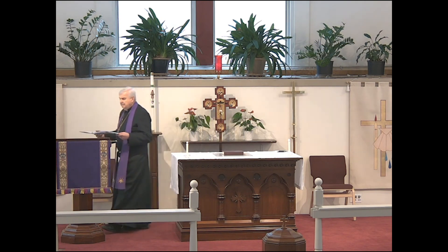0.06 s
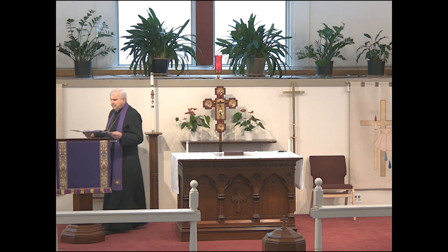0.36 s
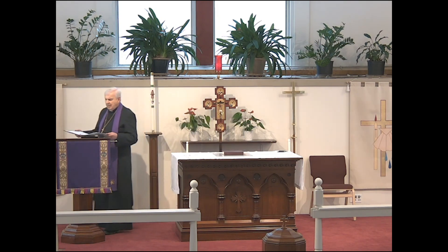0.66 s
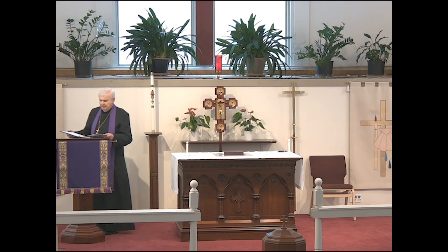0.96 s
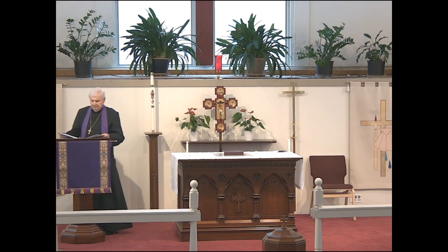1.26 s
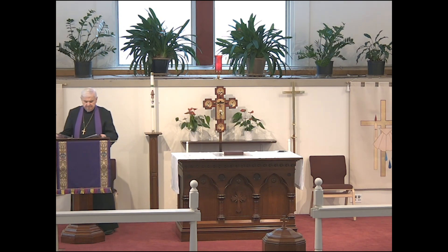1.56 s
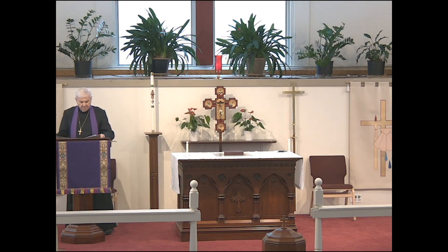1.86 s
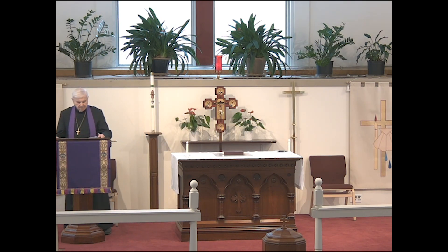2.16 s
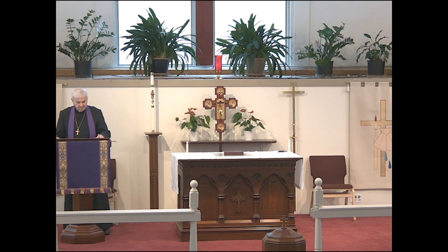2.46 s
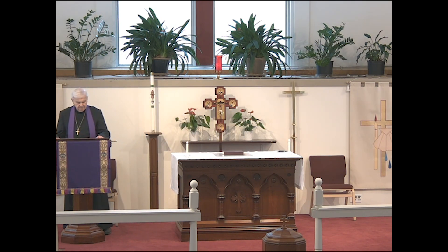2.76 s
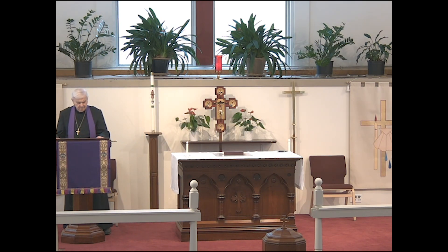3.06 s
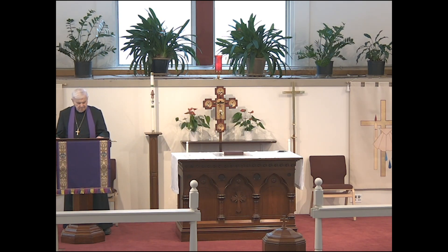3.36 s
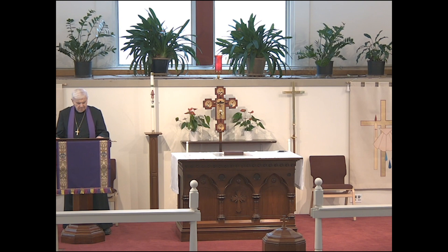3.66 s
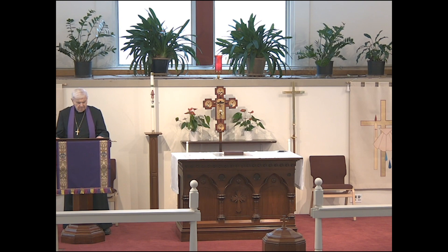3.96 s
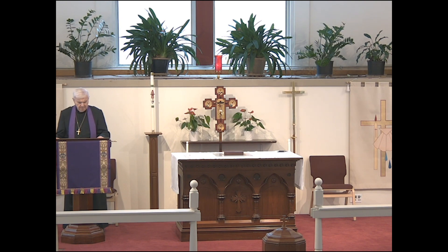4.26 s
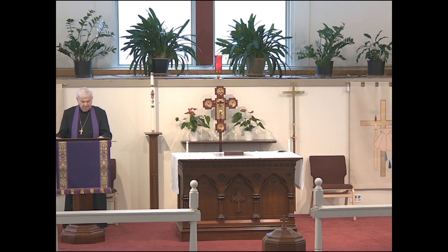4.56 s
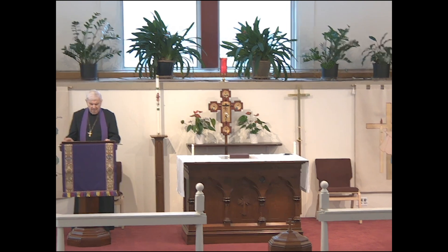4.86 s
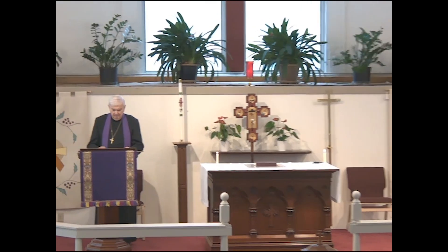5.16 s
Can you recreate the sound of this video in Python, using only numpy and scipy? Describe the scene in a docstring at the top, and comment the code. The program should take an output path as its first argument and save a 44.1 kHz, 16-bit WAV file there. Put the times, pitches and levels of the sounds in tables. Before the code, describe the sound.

Faint ventilation rumble and hiss fill a quiet hall throughout. At the start a floorboard gives softly and a robe barely swishes. At about 1.2 seconds a book touches a wooden lectern, landing with a firmer hollow thump and papery crack at 1.5. From 1.8 to 2.3 seconds it slides into place with light ticks and a hiss of pages. Between 2.4 and 3.3 seconds the cover scrapes and gives tiny squeaks, the desk top shudders low under leaning hands, and a few more taps follow. At 3.7 seconds a hand bumps the microphone and drags along its neck with a low rub. At about 4.15 seconds the holder snaps round with a quick cluster of clacks and thumps, the loudest moment, briefly distorting. Then only ventilation remains. All the handling sounds are very close, carried through the wood, with little hall echo.

```python
"""A quiet hall, at a wooden lectern: a book is set down and slid into place, the microphone is handled. Over
ventilation noise a robe swishes and a floorboard gives. Thumps reach the microphone through the wood; paper
ticks and hisses; a hand scrapes and squeaks on the desk; the desk top shudders under leaning hands. Last, a
hand drags on the microphone neck and the holder snaps round with a clack that clips the input."""
import sys
import numpy as np
from scipy import signal
from scipy.fft import rfft, irfft
from scipy.io import wavfile
from scipy.ndimage import uniform_filter1d

SR = 44100
rng = np.random.default_rng(int(sys.argv[2]) if len(sys.argv) > 2 else 0)


def unload_audio(sound):
    """Save the sound as a 16-bit wav file, at the path given as the first command line argument."""
    columns = np.transpose(np.atleast_2d(sound))
    # keep every value between -1 and 1, then stretch to whole-number steps
    steps = np.round(np.clip(columns, -1, 1) * 32767)
    wavfile.write(sys.argv[1], SR, steps.astype(np.int16))


N = 230095
T = np.arange(N) / SR
EVENT_T = T[:SR // 2]

# Strokes: t = end of swell; swell and fade = time per 20 dB. Spectra and resonances: relative gains.
# ventilation spectrum: f/Hz, gain/dB
VENT_SPECTRUM = [(26, -45), (45, -9), (70, 0.5), (91, -11), (189, -7), (208, -13), (355, -14.5), (391, -20),
                 (421, -16.5), (652, -19.5), (773, -20.5), (873, -20.5), (9920, -40), (13600, -45.5),
                 (15000, -58)]
# hall resonances: f/Hz, width/Hz, gain/dB
HALL_MODES = [(680, 36, 15), (1230, 50, 15)]
# robe strokes: t/s, level/dB, swell/s, fade/s
ROBE_SWISHES = [(.08, -70, 0.4, 0.12), (.21, -90, 0.064, 0.053), (.89, -68, 0.084, 0.088)]
# cloth rustle bands: f/Hz, width/Hz, gain/dB
ROBE_BANDS = [(1170, 230, 1.5), (2200, 660, -4.5)]
# page strokes: t/s, hold/s, level/dB, swell/s, fade/s, edge trim/dB
PAGE_GLIDES = [(1.225, 0, -58.5, 0.0039, 0.079, -11), (1.446, 0.0042, -69, 0.081, 0.13, 0.5),
               (1.614, 0.17, -63.5, 0.21, 0.21, -26.5), (1.94, 0.098, -68, 0.15, 0.22, 4.5),
               (2.964, 0.081, -68, 0.21, 0.075, -12), (4.133, 0.03, -59.5, 0.22, 0.025, -5.5)]
# sheet on sheet: f/Hz, gain/dB
PAGE_SPECTRUM = [(800, -1), (2000, -3), (3300, -2), (4800, -1), (6200, -4), (8000, -10.5), (14000, -17)]
# dragging page edge: f/Hz, width/Hz, gain/dB
EDGE_BAND = [(9600, 8600, 0)]
# hands leaning on the desk: t/s, level/dB, fade/s
HAND_LEANS = [(2.546, -39.5, 0.15), (2.77, -47.5, 0.33), (3.32, -58.5, 0.94), (4.33, -51.5, 0.13)]
# hand squeaking on the desk: t/s, peak/dB, f/Hz, t60/s
HAND_SQUEAKS = [(2.368, -39, 1266, 0.037), (2.385, -51.5, 1248, 0.069), (2.474, -53.5, 1208, 0.27),
                (2.524, -53, 1165, 0.11), (2.756, -40, 1156, 0.039), (2.767, -45.5, 1166, 0.049)]
# pushes of the book: t/s, hold/s, relative level/dB
BOOK_PUSHES = [(1.233, 0.11, -63.5), (1.433, 0.015, -63), (1.62, 0.2, -65.5), (1.88, 0.019, -62),
               (1.928, 0.083, -49.5), (2.041, 0.025, -48), (2.139, 0.059, -53.5), (2.231, 0.022, -55.5)]
# book on desk: f/Hz, gain/dB
SLIDE_SPECTRUM = [(35, -44), (60, -3), (127, 2.5), (231, -12.5), (325, -9.5), (468, -13), (530, -5.5),
                  (660, -7), (810, -12.5), (1000, -18.5), (1220, -17), (1400, -22), (2470, -25.5),
                  (3480, -36), (3990, -25), (14000, -59)]
# stiff cover: f/Hz, width/Hz, gain/dB
COVER_MODES = [(647, 37, -3), (792, 52, 0)]
# hand strokes on the desk: t/s, relative level/dB, swell/s, fade/s
HAND_SCRAPES = [(2.373, -45, 0.0057, 0.027), (2.519, -52, 0.072, 0.14), (2.705, -54, 0.04, 0.13),
                (2.758, -40, 0.021, 0.022), (2.84, -58.5, 0.015, 0.16), (2.998, -50, 0.024, 0.027),
                (3.206, -47.5, 0.039, 0.063), (3.229, -44.5, 0.01, 0.03), (3.255, -52.5, 0.012, 0.073)]
# scraped desk top: f/Hz, width/Hz, gain/dB
DESK_MODES = [(305, 53, 11.5), (505.2, 15.6, 9.5), (587, 18, 4.5), (806, 35, -4), (1143, 5.2, 9),
              (2030, 88, -11.5), (3820, 44, -7.5)]
# hand on the neck, easing or tightening: t/s, hold/s, relative level/dB, sag/(dB/s)
NECK_GRIPS = [(3.66, 0.17, -37.5, 28), (3.911, 0.316, -45.5, -18.5)]
# skin on the neck: f/Hz, gain/dB
GRIP_SPECTRUM = [(24, -27.5), (40, -21), (100, 2), (158, -4.5), (207, -9.5), (401, -21.5), (512, -20.5),
                 (700, -33.5), (815, -40.5), (1150, -37), (2710, -43.5), (14000, -58)]
# paper and cover tapping the desk: t/s, peak/dB, t60/s, struck spot f/Hz
BOOK_TAPS = [(1.223, -37, 0.02, 5370), (1.456, -49, .012, 2080), (1.5002, -28, 0.015, 3360),
             (1.5046, -24.5, 0.0038, 4350), (1.6096, -39, 0.0051, 3820), (1.625, -43.5, 0.017, 1030),
             (1.8518, -47, .012, 2010), (1.89, -43, 0.017, 1530), (1.9291, -42.5, 0.022, 804),
             (1.9596, -37, 0.022, 4850), (1.986, -47, 0.01, 4000), (2.017, -41, .025, 780),
             (2.0293, -30.5, 0.0051, 4300), (2.049, -39.5, 0.042, 1620), (2.085, -50, 0.023, 720),
             (2.1202, -34, 0.016, 850), (2.2329, -33, 0.011, 2070), (2.248, -34.5, 0.019, 2170),
             (2.255, -42, 0.045, 1500), (2.271, -43.5, 0.031, 2590), (2.4048, -30.5, 0.0068, 1900),
             (3.04, -47.5, 0.032, 1180), (3.13, -39, 0.018, 3800), (3.199, -29.5, 0.012, 2310),
             (3.208, -32.5, 0.036, 2700), (3.2149, -33, 0.014, 3650), (3.225, -27.5, 0.021, 3940),
             (3.697, -41, .007, 2500), (3.724, -40.5, 0.0068, 2970), (3.992, -42.5, 0.011, 2750),
             (4.062, -44, 0.0091, 6000), (4.1349, -22.5, 0.011, 4340), (4.2278, -41, 0.007, 2020),
             (4.295, -45, 0.018, 2960)]
# taps and crackles: f/Hz, gain/dB
PAPER_SPECTRUM = [(120, 10.5), (400, 7), (1000, -1.5), (2200, -4.5), (3200, -5), (4400, -3.5), (7000, -8.5),
                  (14000, -9)]
# blows on the lectern; a resting hand shortens the ring and stiffens the stand:
# t/s, peak/dB, contact/ms, t60 factor, relative sway/dB, sway f/Hz
LECTERN_BLOWS = [(1.222, -31, 1.44, 1.45, -23, 60), (1.236, -26.5, 3.2, 0.61, 12, 100),
                 (1.454, -42.5, 2.1, 1.3, -17, 70), (1.5, -13, 10.3, 0.88, 6.5, 95),
                 (1.5083, -21.5, 1.94, 0.79, 11, 92), (1.625, -45, 1.5, 1.6, -14, 70),
                 (1.792, -40, 4.6, 0.83, -16, 70), (2.018, -34, 7.2, 1.8, 12, 70),
                 (2.05, -42, 3.3, 0.56, 1, 65), (2.062, -33, 2.5, .7, 1, 90),
                 (2.12, -37.5, 0.74, 0.52, 1, 70), (2.282, -38.5, 5.2, 1.4, -15, 69.6),
                 (2.379, -40.5, 6.2, 1.6, -29, 70), (2.769, -34, 1.9, 1.33, -2, 65),
                 (3.003, -34, 4.2, 0.74, -6, 79), (3.229, -25.5, 0.78, 0.83, 10, 75),
                 (3.666, -17, 4.1, 0.38, 7, 110), (3.76, -33.5, 3, 1.2, -2, 110),
                 (3.827, -32.5, 5.2, 2.2, 3, 89), (4.067, -26.5, 3.5, 0.32, 6, 126),
                 (4.111, -39, 3.2, 0.55, 0.5, 140), (4.1363, -14.5, 4.3, 0.21, -15, 92),
                 (4.147, -8.5, 1.2, 0.55, 8.5, 62), (4.17, -16.5, 2.2, 0.23, 14, 180),
                 (4.184, -28.5, 7, 0.24, 23, 69.2), (4.1953, -12.5, 2.45, 0.28, 1, 115),
                 (4.3, -45.5, 2.14, 1.5, -21, 70)]
# lectern wood: f/Hz, gain/dB, t60/s
WOOD_MODES = [(85, -3, 0.29), (106.3, 5, 0.17), (129.2, -3.5, 0.13), (169.2, -2, 0.12), (197.3, 0, 0.25),
              (307, -17.5, 0.048), (324.3, -5, 0.11), (434, -10, 0.2), (520, -2.5, 0.14), (547, -9, 0.096),
              (617.5, -6, 0.2), (650, -19, 0.095), (854, -4, 0.06), (987, -10.5, 0.186), (1200, -12, 0.1)]
# metal neck snapping as it bends: t/s, peak/dB
NECK_SNAPS = [(3.6796, -45), (3.697, -55), (3.7035, -50), (3.7239, -32.5), (4.1349, -20), (4.1493, -22)]
# metal neck: f/Hz, width/Hz, gain/dB
NECK_MODES = [(9870, 360, 2), (11400, 870, -11)]
# holder knocking in its socket: t/s, peak/dB, cutoff/Hz
HOLDER_KNOCKS = [(4.1355, -30, 4500), (4.146, -7, 6000), (4.148, -11, 3400), (4.15, -13, 3960),
                 (4.1705, -19, 2900), (4.1787, -21, 2200)]
# damped holder body: f/Hz, width/Hz, gain/dB
HOLDER_MODES = [(280, 19, 17), (349, 42, 17.5), (410, 40, 15.5), (491, 34.6, 18.5), (685, 30, 13.5),
                (924, 29, 10), (1049, 23, 2), (1387, 71, 5.5), (1580, 40, 4), (1747, 67, 5),
                (1962, 108, 15), (2350, 55, 4.5), (2656, 130, 1), (3470, 71, -2.5), (4360, 70, -11.5),
                (5100, 330, -12.5)]


def undb(db):
    """Decibels to gain."""
    return 10 ** (np.asarray(db) / 20)


def unit(x):
    """Scale to rms 1."""
    return x / np.sqrt(np.mean(x ** 2))


def peak(x, db):
    """Scale to a peak level."""
    return x * undb(db) / np.abs(x).max()


def decay(t60_s, t=EVENT_T):
    """Exponential decay."""
    return np.exp(-np.log(1000) * t / max(t60_s, 1e-4))


def add(out, t_s, x):
    """Mix x in at t_s."""
    i = int(t_s * SR)
    out[i:i + len(x)] += x[:N - i]


def lowpass(x, hz):
    """Second-order roll-off."""
    return signal.sosfilt(signal.butter(2, min(hz, .45 * SR), fs=SR, output="sos"), x)


def colour(x, spectrum):
    """Causal filter with the given spectrum, via its cepstrum."""
    hz, db = np.transpose(spectrum)
    size = 2 ** 13
    log_hz = np.log(np.fft.rfftfreq(size, 1 / SR) + 1)
    log_gain = np.log(undb(np.interp(log_hz, np.log(hz), db)))
    cepstrum = irfft(log_gain)[:size // 2]
    cepstrum[1:] *= 2
    return signal.fftconvolve(x, irfft(np.exp(rfft(cepstrum, size))))[:len(x)]


def resonate(x, modes):
    """Parallel resonators."""
    return sum(undb(db) * signal.lfilter(*signal.iirpeak(hz, hz / width_hz, SR), x)
               for hz, width_hz, db in modes)


def wander(rate_hz):
    """Smooth random drift, rms 1."""
    span = int(SR / rate_hz)
    steps = np.repeat(rng.standard_normal(N // span + 1), span)
    return unit(uniform_filter1d(steps, span)[:N])


def friction(slips_per_s, patchy_db):
    """Dense tiny slips, uneven in size, in patches."""
    slips = (rng.random(N) < slips_per_s / SR) * rng.standard_normal(N)
    size_db = 2.5 * np.minimum(rng.exponential(size=N), 4)
    return slips * undb(size_db + patchy_db * wander(70))


def stroke(t_s, db, swell_s, fade_s, hold_s=0, sag_db_per_s=0):
    """Gain of one rub: swell, sloping hold, fade."""
    before_s, after_s = np.maximum(t_s - T, 0), np.maximum(T - t_s - hold_s, 0)
    sag_db = sag_db_per_s * np.clip(T - t_s, 0, hold_s)
    return undb(db - sag_db - 20 * (before_s / swell_s + after_s / fade_s))


def ventilation(level_db=-63.5):
    """Steady rumble and hiss."""
    return undb(level_db) * unit(colour(rng.standard_normal(N), VENT_SPECTRUM))


def reverb(x, tail_db=-40, tail_t60_s=0.93, early_db=-38, early_t60_s=0.21, delay_s=.02):
    """Short dull wash off nearby panels, dark hall tail; faint, as the sources are close."""
    tail, early = rng.standard_normal((2, N)) * (T > delay_s)
    tail = lowpass(lowpass(tail, 900) + resonate(tail, HALL_MODES), 1500) * decay(tail_t60_s, T)
    early = lowpass(lowpass(early, 1500), 1500) * decay(early_t60_s, T)
    response = undb(tail_db) * tail / np.linalg.norm(tail) + undb(early_db) * early / np.linalg.norm(early)
    return signal.fftconvolve(x, response)[:N]


def robe():
    """Swinging cloth: soft rushes of tiny slips."""
    cloth = unit(resonate(friction(3500, patchy_db=5), ROBE_BANDS))
    return cloth * sum(stroke(*swish) for swish in ROBE_SWISHES)


def footfall(t_s=.192, peak_db=-43.5, hz=116, t60_s=.19, settle_t60_s=0.031):
    """A floorboard's note sinks as weight settles; the sole scuffs."""
    settling = decay(settle_t60_s)
    phase = 2 * np.pi * np.cumsum(hz * (1 + 1.4 * settling)) / SR
    scuff = 0.088 * unit(resonate(rng.standard_normal(len(EVENT_T)), [(260, 100, 0)]))
    out = np.zeros(N)
    add(out, t_s, peak((np.sin(phase) + scuff) * decay(t60_s) * (1 - settling), peak_db))
    return out


def pages(edge_db=-3):
    """Sheets hiss face to face, brighter where an edge drags."""
    slips = friction(8000, patchy_db=0.5)
    face = unit(colour(slips, PAGE_SPECTRUM))
    edge = unit(resonate(resonate(slips, EDGE_BAND), EDGE_BAND))
    return sum((face + undb(edge_db + trim_db) * edge) * stroke(t_s, db, swell_s, fade_s, hold_s)
               for t_s, hold_s, db, swell_s, fade_s, trim_db in PAGE_GLIDES)


def desk_shudder(hz=73.5, wobble=0.0642, swell_s=0.064):
    """Slow stick-slip swings the desk top unevenly near its lowest mode."""
    phase = 2 * np.pi * np.cumsum(hz * (1 + wobble * wander(10))) / SR
    swing = unit(np.sin(phase) * undb(2.5 * wander(30)))
    return swing * sum(stroke(t_s, db, swell_s, fade_s) for t_s, db, fade_s in HAND_LEANS)


def hand_squeaks(sharp=0.033, settle_t60_s=.04, jitter=.04, rise_share=0.35):
    """Stick-slip: starts sharp, settles on an unsteady pitch; long squeaks start softly."""
    out = np.zeros(N)
    for t_s, db, hz, t60_s in HAND_SQUEAKS:
        bend = 1 + sharp * decay(settle_t60_s) + jitter * wander(590)[:len(EVENT_T)]
        phase = 2 * np.pi * np.cumsum(hz * bend) / SR
        tone = np.sin(phase) + undb(-18) * np.sin(1.8 * phase)
        add(out, t_s, peak(tone * decay(t60_s) * (1 - decay(rise_share * t60_s)), db))
    return out


def book_slide(glide_db=4.5, crackle_db=-13, crackles_per_s=90):
    """Slips ring the cover, paper catches and crackles; each push slows as it goes."""
    slips = friction(3000, patchy_db=1.8)
    glide = undb(glide_db) * unit(colour(slips + resonate(slips, COVER_MODES), SLIDE_SPECTRUM))
    catches = (rng.random(N) < crackles_per_s / SR) * rng.uniform(-1, 1, N)
    crackle = undb(crackle_db) * unit(colour(catches, PAPER_SPECTRUM))
    push = sum(stroke(t_s, db, swell_s=0.03, fade_s=0.059, hold_s=hold_s, sag_db_per_s=33)
               for t_s, hold_s, db in BOOK_PUSHES)
    return (glide + crackle) * push


def hand_scrapes(gain_db=-1, grit_db=-19, cutoff_hz=4200):
    """The hand's slips ring the desk top, with faint grit."""
    slips = friction(8700, patchy_db=2)
    grit = undb(grit_db) * unit(lowpass(slips, cutoff_hz))
    rasp = lowpass(unit(resonate(slips, DESK_MODES)) + grit, cutoff_hz)
    return undb(gain_db) * rasp * sum(stroke(*scrape) for scrape in HAND_SCRAPES)


def neck_grip(gain_db=-3, swell_s=0.0063, fade_s=0.069):
    """Skin drags on the microphone neck: a low rub."""
    rub = undb(gain_db) * unit(colour(friction(4000, patchy_db=2), GRIP_SPECTRUM))
    return rub * sum(stroke(t_s, db, swell_s, fade_s, hold_s, sag_db_per_s)
                     for t_s, hold_s, db, sag_db_per_s in NECK_GRIPS)


def book_taps(rattle_db=-26, rattle_t60_s=0.14, spot_width_hz=480, spot_db=8, db_per_octave=12.5):
    """Paper or board cracks and rattles, the struck spot rings; harder is brighter."""
    out = np.zeros(N)
    for t_s, db, t60_s, spot_hz in BOOK_TAPS:
        envelope = decay(t60_s) + undb(rattle_db) * decay(rattle_t60_s)
        crack = rng.standard_normal(len(EVENT_T)) * envelope
        crack[0] = 5  # contact impulse
        crack += resonate(crack, [(spot_hz, spot_width_hz, spot_db)])
        cutoff_hz = 4760 * 2 ** ((db + 35.5) / db_per_octave)
        add(out, t_s, peak(lowpass(colour(crack, PAPER_SPECTRUM), cutoff_hz), db))
    return out


def wood_ring(t60_factor, scatter_db=1, detune=0.019):
    """Decaying modes; each blow lands elsewhere and shifts their levels and pitches."""
    draws = rng.standard_normal((len(WOOD_MODES), 2))
    out = np.zeros(len(EVENT_T))
    for (level_draw, pitch_draw), (hz, db, t60_s) in zip(draws, WOOD_MODES):
        tone = np.sin(2 * np.pi * hz * (1 + detune * pitch_draw) * EVENT_T)
        out += undb(db + scatter_db * level_draw) * decay(t60_s * t60_factor) * tone
    return out


def lectern_thumps(sway_t60_s=0.072):
    """A soft blow rings the wood and rocks the stand; longer contact is duller."""
    out = np.zeros(N)
    for t_s, db, contact_ms, t60_factor, sway_db, sway_hz in LECTERN_BLOWS:
        age = EVENT_T[:SR // 20] * 1000 / contact_ms
        force = age ** 2 * np.exp(-3 * np.pi * age)
        sway = undb(sway_db) * decay(sway_t60_s) * np.sin(2 * np.pi * sway_hz * EVENT_T)
        add(out, t_s, peak(signal.fftconvolve(wood_ring(t60_factor) + sway, force), db))
    return out


def neck_snaps(t60_s=0.0043, tail_db=-21, tail_t60_s=0.023):
    """The bending metal neck slips and rings brightly."""
    out = np.zeros(N)
    envelope = decay(t60_s) + undb(tail_db) * decay(tail_t60_s)
    for t_s, db in NECK_SNAPS:
        slip = rng.standard_normal(len(EVENT_T)) * envelope
        add(out, t_s, peak(resonate(slip, NECK_MODES), db))
    return out


def holder_clacks(chatter_db=-23, chatter_t60_s=0.026, crack_db=-19):
    """Each knock rings the holder's body and chatters in the socket."""
    out = np.zeros(N)
    highpass = signal.butter(2, 900, "high", fs=SR)
    for t_s, db, cutoff_hz in HOLDER_KNOCKS:
        chatter = signal.lfilter(*highpass, rng.standard_normal(len(EVENT_T)))
        force = undb(chatter_db) * chatter * decay(chatter_t60_s)
        force[0] = 1  # contact impulse
        clack = resonate(force, HOLDER_MODES) + undb(crack_db) * force
        add(out, t_s, peak(lowpass(clack, cutoff_hz), db))
    return out


def scene():
    """Close sounds at the lectern plus the hall; mono."""
    near = footfall() + robe() + lectern_thumps() + book_taps() + holder_clacks() + neck_snaps()
    near += hand_squeaks() + pages() + book_slide() + hand_scrapes() + neck_grip() + desk_shudder()
    return (near + reverb(near) + ventilation())[None]


def record(dry, low_hz=38, clip_level=.28, top_hz=14400):
    """Input stage: rumble cut, clipping on the loudest peaks, top cut."""
    sound = signal.sosfilt(signal.butter(3, low_hz, "high", fs=SR, output="sos"), dry)
    clipped = np.clip(sound, -clip_level, clip_level)
    return signal.sosfilt(signal.ellip(10, .2, 70, top_hz, fs=SR, output="sos"), clipped)


dry = scene()
out = record(dry)
unload_audio(out)
```